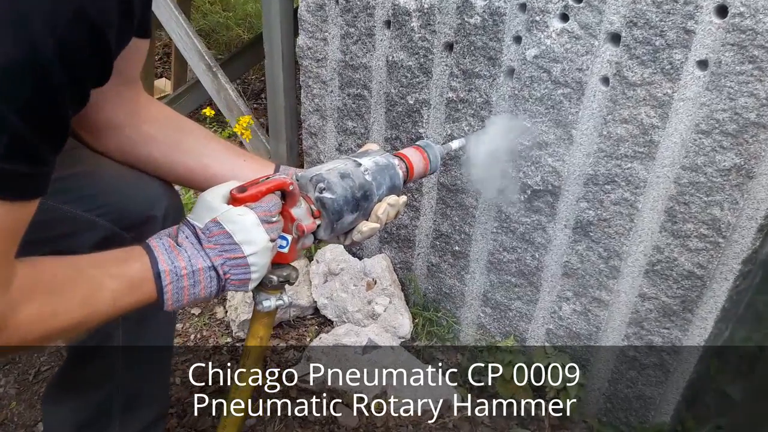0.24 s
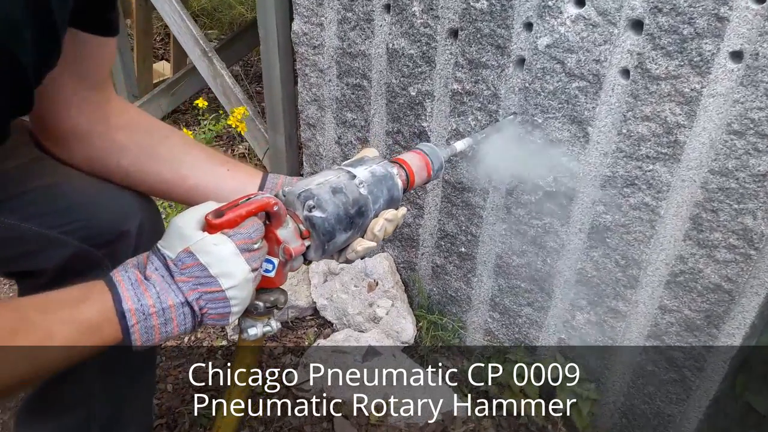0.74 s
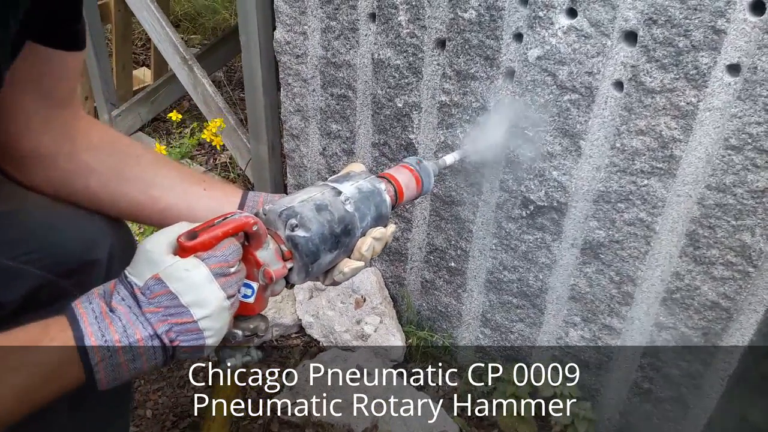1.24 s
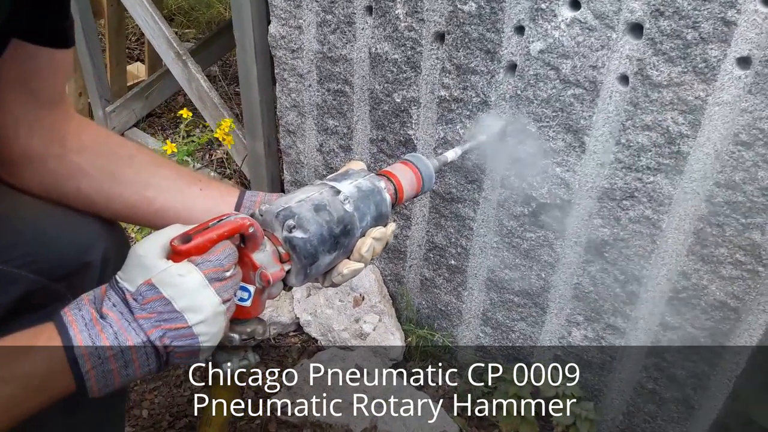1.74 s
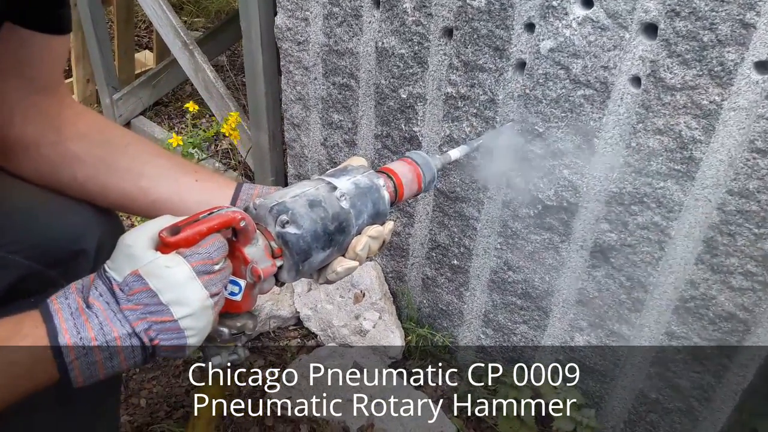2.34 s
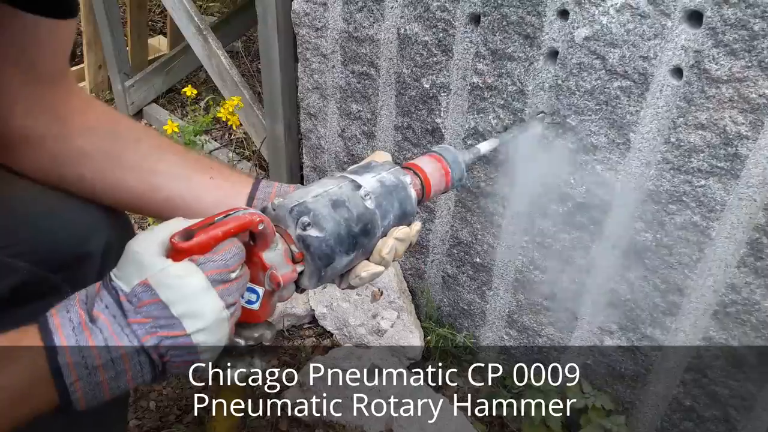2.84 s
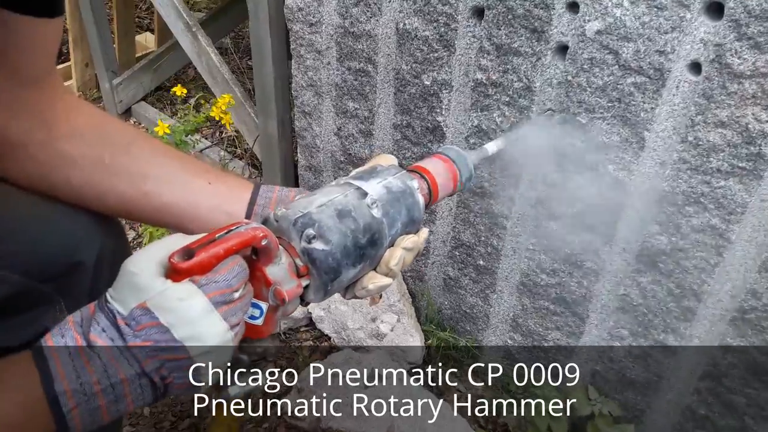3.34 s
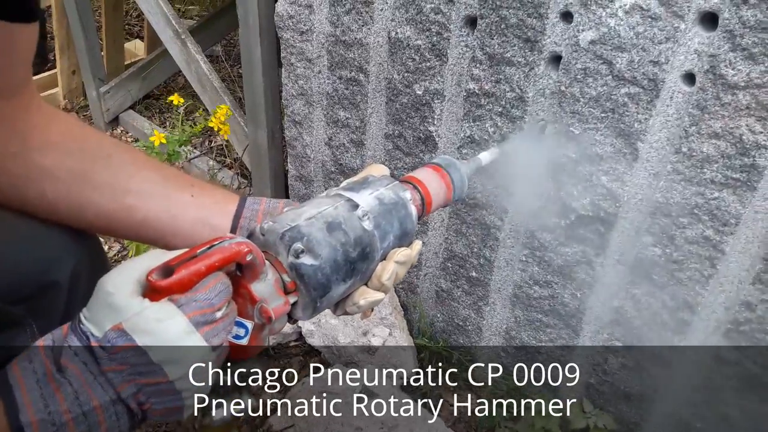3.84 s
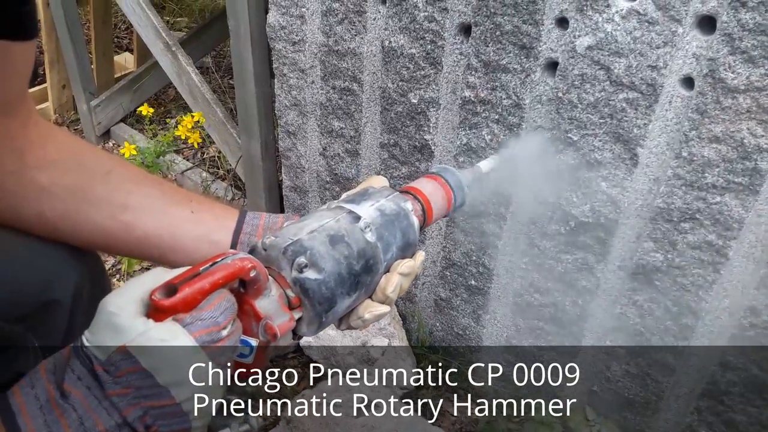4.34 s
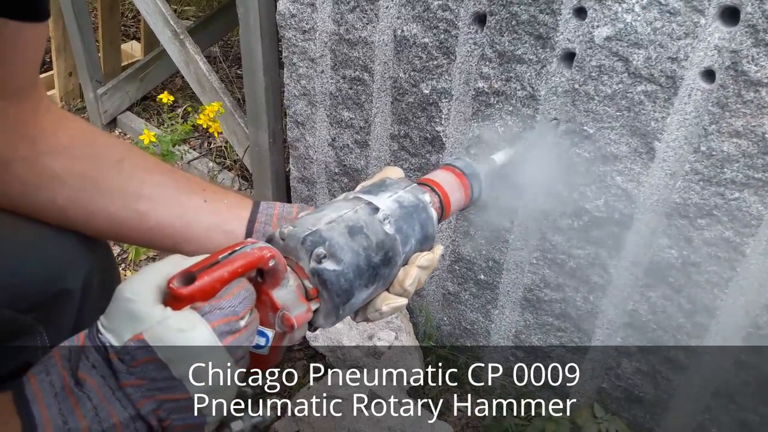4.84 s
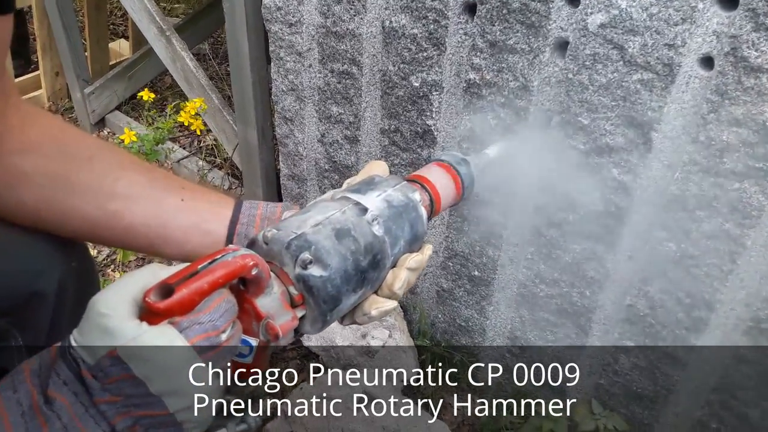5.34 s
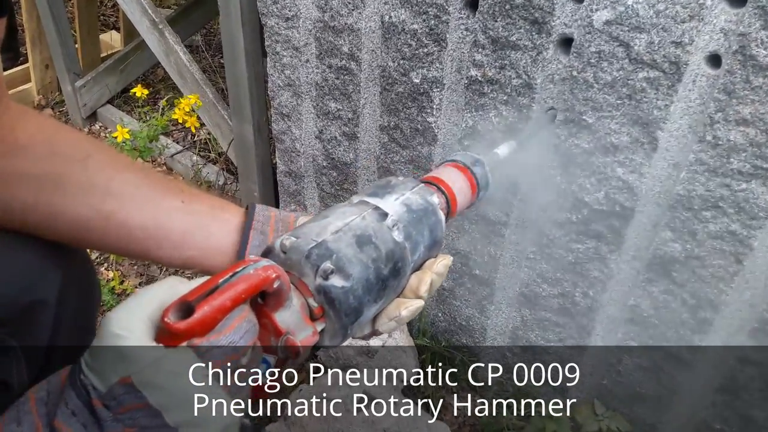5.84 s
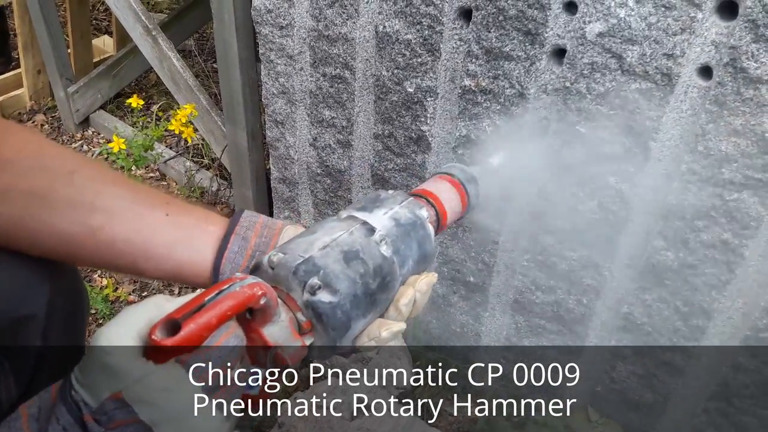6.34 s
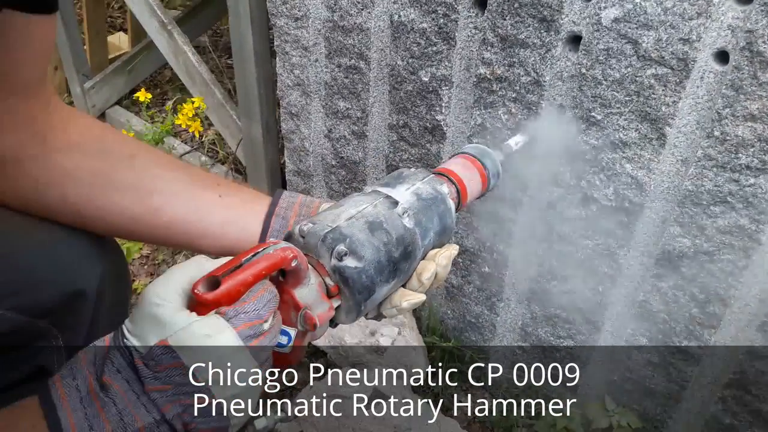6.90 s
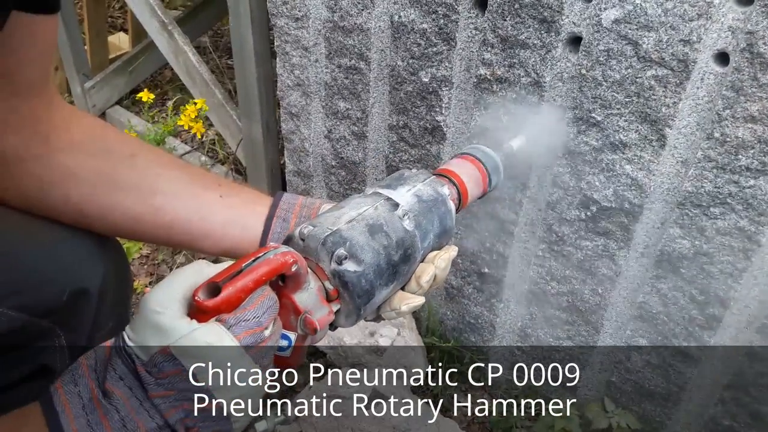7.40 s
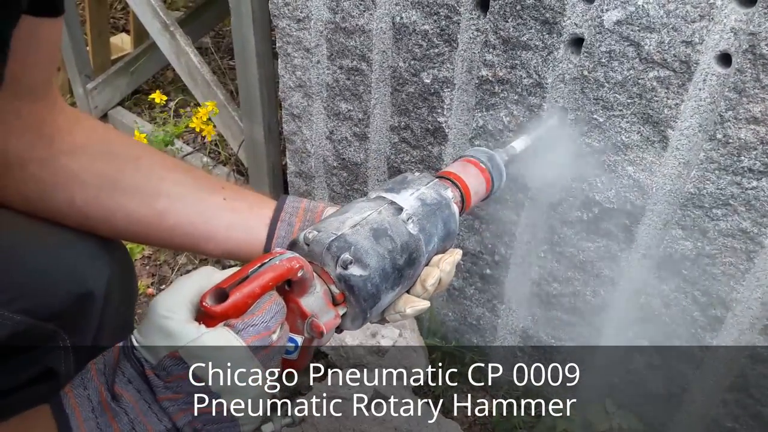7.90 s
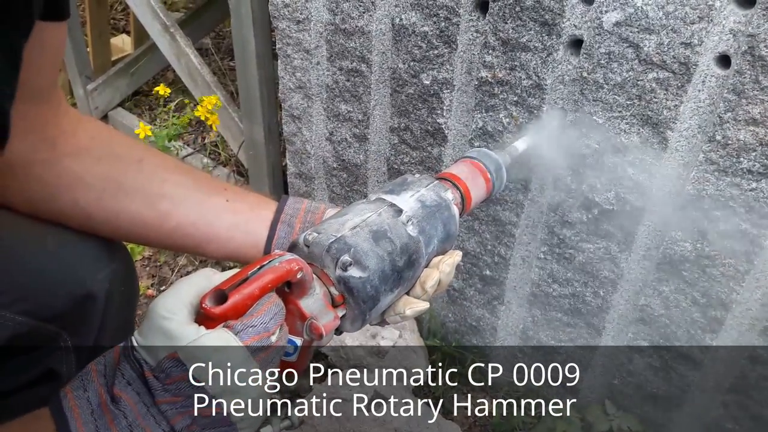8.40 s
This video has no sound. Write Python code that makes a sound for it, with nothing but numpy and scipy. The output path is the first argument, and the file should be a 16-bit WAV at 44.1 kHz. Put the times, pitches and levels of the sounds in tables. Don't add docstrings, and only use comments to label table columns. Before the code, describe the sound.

Fast, rattling air-powered drilling in stone with puffing exhaust and metallic ringing, slowing slightly, interrupted by a short silence, then resuming under low gusts.

```python
import sys
import numpy as np
from scipy import signal
from scipy.fft import rfft, irfft
from scipy.io import wavfile
from scipy.ndimage import uniform_filter1d, minimum_filter1d

SR = 44100
rng = np.random.default_rng(int(sys.argv[2]) if len(sys.argv) > 2 else 0)


def attenuation_scalar(level_db):
    decades = np.asarray(level_db, float) / 20
    return 10 ** decades


def generate_wav(signal):
    frames = np.transpose(np.atleast_2d(signal))
    scaled = np.clip(frames, -1, 1) * 32767
    pcm = np.round(scaled).astype(np.int16)
    wavfile.write(sys.argv[1], SR, pcm)


N = 381906
T_S = np.arange(N) / SR
DROPOUT_S, RETURN_S, FADE_IN_S = 6.9022, 7.3025, 0.29


def rms_one(x):
    return x / np.sqrt(np.mean(x ** 2) + 1e-20)


def colour(x, spectrum):
    f_hz, gain_db = np.transpose(spectrum)
    bins_hz = np.maximum(np.fft.rfftfreq(4096, 1 / SR), 10)
    log_gain = np.log(attenuation_scalar(np.interp(np.log(bins_hz), np.log(f_hz), gain_db)))
    cepstrum = irfft(log_gain)
    cepstrum[1:2048] *= 2
    cepstrum[2049:] = 0
    impulse_response = irfft(np.exp(rfft(cepstrum)))
    return signal.oaconvolve(x, impulse_response[None], axes=1)[:, :N]


def high_pass(x, order, cut_hz):
    return signal.sosfilt(signal.butter(order, cut_hz, "high", fs=SR, output="sos"), x)


def flutter(rate_hz, depth_db):
    r = np.exp(-2 * np.pi * rate_hz / SR)
    drift = signal.lfilter([1], [1, -2 * r, r * r], rng.standard_normal((2, N)))
    return attenuation_scalar(depth_db * rms_one(drift))


def with_depth(turn_db, turn_s, loss_db_per_s, later_db):
    boring_db = turn_db - loss_db_per_s * np.abs(T_S - turn_s)
    return np.where(T_S < DROPOUT_S, boring_db, later_db)


def blows(at, delay_s, jitter_s, shared_db, own_db):
    luck = rng.standard_normal((len(at), 4))
    when_s = at + delay_s + jitter_s * luck[:, 0]
    train = np.zeros((2, N))
    index = np.clip(when_s * SR, 0, N - 1).astype(int)
    train[:, index] = attenuation_scalar(shared_db * luck[:, 1] + own_db * luck[:, 2:].T)
    return train


def swell(train, rise_s, fall_s, hold_s=0):
    hold = int(hold_s * SR) + 1
    train = uniform_filter1d(train, size=hold, origin=(hold - 1) // 2)
    for seconds in (rise_s, rise_s, fall_s):
        pole = np.exp(-1 / (max(seconds, 1e-4) * SR))
        train = signal.lfilter([1], [1, -pole], train + 1e-12)
    return rms_one(train)


def flushing_air():
    # f/Hz, level/dB
    hiss = [(40, -5.5), (150, -7.5), (600, 2.5), (1800, 6.5), (4000, -6), (7500, 2.5), (11000, 3),
            (15700, -10.5)]
    port_db = [
        [-26],
        [-29],
    ]
    jet = flutter(rate_hz=23, depth_db=1.5) * rng.standard_normal((2, N))
    return attenuation_scalar(port_db) * rms_one(colour(jet, hiss))


def buffeting_gain():
    # start t/s, end t/s, level/dB
    gusts = [
        (5.9, 6.35, -33),
        (7.294, 7.624, -20),
        (7.655, 7.983, -17.5),
        (8.035, 8.22, -18.5),
    ]
    edge_s = 0.095
    gain = attenuation_scalar(with_depth(turn_db=-31, turn_s=6.0, loss_db_per_s=0.8, later_db=-35.5))
    for start_s, end_s, gust_db in gusts:
        inside_s = np.minimum(T_S - start_s, end_s - T_S)
        gain = gain + attenuation_scalar(gust_db) * np.clip(inside_s / edge_s + .5, 0, 1)
    return gain


def piston():
    # t/s, rate/(blows/s)
    speed = [(0.0, 56.69), (1.5, 54.68), (2.5, 53.86), (4.6, 53.35), (5.0, 53.4), (5.7, 51.34), (7.5, 50.5),
             (8.66, 50.62)]
    first_blow_s, wander_s, wander_per_s = .007, .001, 5
    speed_s, blows_per_s = np.transpose(speed)
    struck = np.cumsum(np.interp(T_S, speed_s, blows_per_s)) / SR
    at = first_blow_s + np.interp(np.arange(int(struck[-1])), struck, T_S)
    span = int(struck[-1] * SR / N / wander_per_s)
    wander = uniform_filter1d(rng.standard_normal(len(at)), size=span)
    return at + wander_s * rms_one(wander)


def exhaust(at):
    # f/Hz, level/dB
    puff_colour = [(100, -16), (250, -4.5), (500, 0), (1100, 1.5), (2000, -1), (3200, -12.5), (5000, -22),
                   (16000, -17.5)]
    # f/Hz, level/dB
    buffet_colour = [(25, -27), (60, -18), (110, 3), (250, 3), (420, 1), (900, -22.5)]
    vents = blows(at, delay_s=-0.0026, jitter_s=.0006, shared_db=1.05, own_db=0.8)
    eddies = rng.standard_normal((2, 2, N))

    jet = swell(vents, rise_s=.0018, fall_s=0.0039, hold_s=0.0028)
    puff = jet * flutter(rate_hz=225, depth_db=1.5) * eddies[0]
    puff_db = with_depth(turn_db=-15.5, turn_s=6.0, loss_db_per_s=0.98, later_db=-14.5)

    port_open = swell(vents, rise_s=.0012, fall_s=0.0033, hold_s=0.0068)
    buffet = port_open * flutter(rate_hz=2.8, depth_db=1.5) * eddies[1]

    throb = high_pass(jet, order=2, cut_hz=150)
    out = attenuation_scalar(puff_db) * rms_one(colour(puff, puff_colour))
    out += buffeting_gain() * rms_one(colour(buffet, buffet_colour))
    return out + attenuation_scalar(-48.5) * rms_one(throb)


def chuck_rattle(at):
    # f/Hz, level/dB
    rattle_colour = [(400, -17.5), (1500, -4), (3000, -0.5), (5000, -6), (7500, -6.5), (8500, -2.5),
                     (9200, -12), (13000, -4), (15700, -3.5)]
    strikes = blows(at, delay_s=-.0025, jitter_s=.0008, shared_db=1.0, own_db=.8)
    chatter = swell(strikes, rise_s=0.00042, fall_s=0.0068, hold_s=.004)
    rattle = chatter * flutter(rate_hz=390, depth_db=2.5) * rng.standard_normal((2, N))
    rattle_db = with_depth(turn_db=-26, turn_s=18.5, loss_db_per_s=-0.37, later_db=-21)
    return attenuation_scalar(rattle_db + 4.5) * rms_one(colour(rattle, rattle_colour))


def rod_mode(at, f_hz, t60_s, alike, lag_s, spread_db):
    knocks = rng.standard_normal((3, N)) * (rng.random((3, N)) < 2500.0 / SR)
    strikes = blows(at, lag_s, jitter_s=.0012, shared_db=spread_db, own_db=1.0)
    force = swell(strikes, rise_s=.001, fall_s=.0045, hold_s=.005)
    force = force * (np.sqrt(alike) * knocks[0] + np.sqrt(1 - alike) * knocks[1:])
    r, w = attenuation_scalar(-60 / (t60_s * SR)), 2 * np.pi * f_hz / SR
    return rms_one(signal.lfilter([1], [1, -2 * r * np.cos(w), r * r], force + 1e-18))


def steel(at):
    # f/Hz, level/dB, t60/s, left-right likeness/(0-1), left minus right/dB
    long_modes = [(3477, -21.5, 0.019, 0.43, -17), (3063, -21, 0.0059, 0.3, -13.5),
                  (4310, -25.5, 0.015, 0.1, -10.5)]
    bending_modes = [(11200, -17.5, .025, .2, 2), (8140, -19.5, .02, .1, 3), (9310, -31, .02, .1, 0),
                     (5320, -24.5, .018, .3, 0)]
    top_modes = [(13900, -23.5, .035, .5, -3), (14010, -22.5, .035, .5, -3), (6965, -19.5, .045, .75, 2),
                 (7080, -30, .02, .5, 2)]
    long_db = with_depth(turn_db=1.54, turn_s=9.7, loss_db_per_s=0.91, later_db=4)
    bending_db = with_depth(turn_db=2, turn_s=2.8, loss_db_per_s=1.16, later_db=1.1)
    top_db = with_depth(turn_db=3, turn_s=5, loss_db_per_s=1.3, later_db=-0.5)
    # modes, level/dB, lag/s, spread/dB
    families = [(long_modes, long_db, -.003, 1.6),
                (bending_modes, bending_db, .0015, 2.6),
                (top_modes, top_db, .0015, 2.6)]
    out = chuck_rattle(at)
    for modes, family_db, lag_s, spread_db in families:
        for f_hz, mode_db, t60_s, alike, pan_db in modes:
            ring = rod_mode(at, f_hz, t60_s, alike, lag_s, spread_db)
            port_db = pan_db * np.array([[.5], [-.5]])
            grip = flutter(rate_hz=4, depth_db=1.3)[0]
            out += attenuation_scalar(family_db + mode_db - 12.5 + port_db) * ring * grip
    settle_db, settle_s = -1.5, .35
    return out * attenuation_scalar(settle_db * np.exp(-T_S / settle_s))


def scene():
    at = piston()
    return flushing_air() + exhaust(at) + steel(at)


def starve(x):
    # ports, low f/Hz, high f/Hz, share of time blank/(0-1)
    weak_bands = [([0, 1], 7130, 7400, .4), ([0, 1], 7330, 7600, .5), ([0, 1], 7600, 7850, .15), ([0, 1],
                  6500, 6750, .2), ([0, 1], 6200, 6400, .12), ([0, 1], 5900, 6100, .1), ([0, 1],
                  5600, 5850, .12), ([1], 7700, 8050, .45), ([1], 8250, 9100, .5), ([1], 9400, 10400, .15)]
    out, hop = x.copy(), 1024
    for port, low_hz, high_hz, share in weak_bands:
        band_pass = signal.butter(4, [low_hz, high_hz], "band", fs=SR, output="sos")
        band = signal.sosfiltfilt(band_pass, x[port])
        need = uniform_filter1d(rng.standard_normal(N // hop + 1), size=2)
        blank = np.repeat(need < np.quantile(need, share), hop)[:N]
        out[port] -= band * uniform_filter1d(blank * 1., size=hop // 2)
    return out


def band_limit(x):
    return signal.sosfilt(signal.butter(12, 17090, fs=SR, output="sos"), x)


def record(dry):
    # f/Hz, level against left port/dB
    right_port = [(100, 0), (1000, -0.5), (2200, 0), (2900, 10), (3450, 13.5), (4300, 13), (4700, 8),
                  (6300, 4.5), (7400, 1), (7900, -9), (8800, -19), (10600, -2.5), (13000, -1.5), (15700, 2)]
    ports = np.vstack([dry[:1], colour(dry[1:], right_port)])
    ports = high_pass(ports, order=3, cut_hz=46)

    headroom = minimum_filter1d(np.minimum(1, .86 / (np.abs(ports) + 1e-9)), size=129)
    limited = ports * uniform_filter1d(headroom, size=129)

    low_pass = signal.ellip(12, .3, 60, 15740, fs=SR, output="sos")
    before = np.clip((DROPOUT_S - T_S) / 0.00041, 0, 1)
    after = (T_S > RETURN_S) * np.clip(0.03 + (T_S - RETURN_S) / FADE_IN_S, 0, 1)
    mix = signal.sosfilt(low_pass, starve(limited)) * (before + after)
    return band_limit(mix)


dry = scene()
out = record(dry)
generate_wav(out)
```